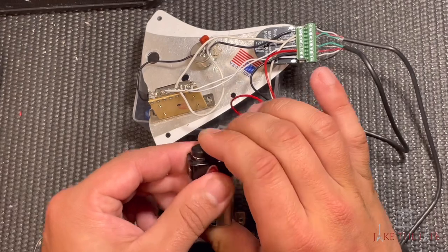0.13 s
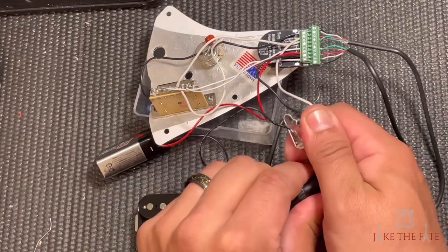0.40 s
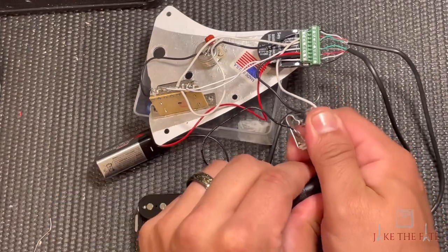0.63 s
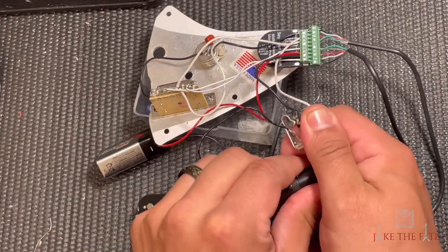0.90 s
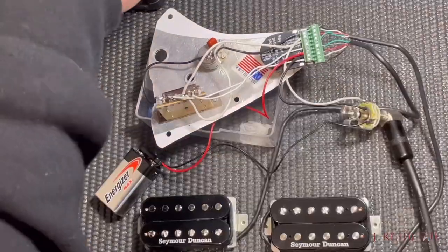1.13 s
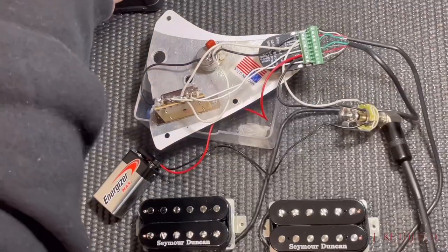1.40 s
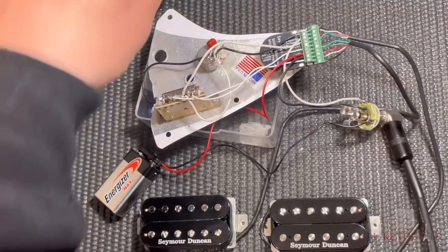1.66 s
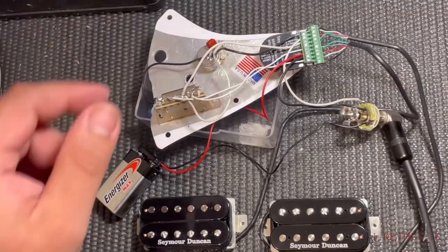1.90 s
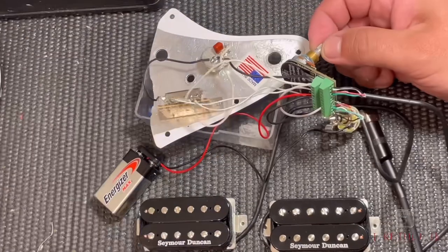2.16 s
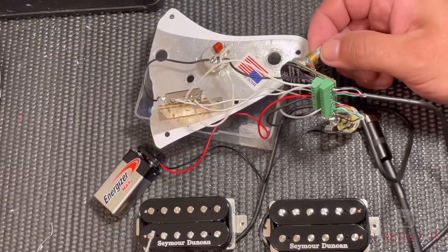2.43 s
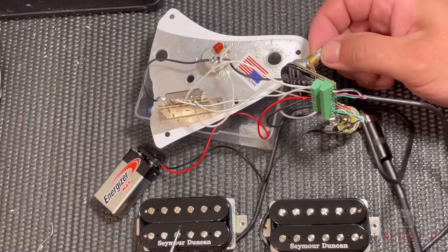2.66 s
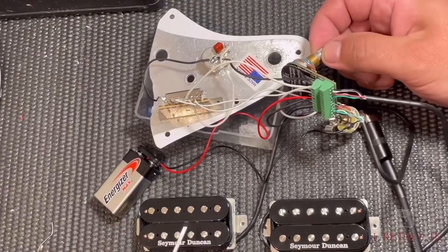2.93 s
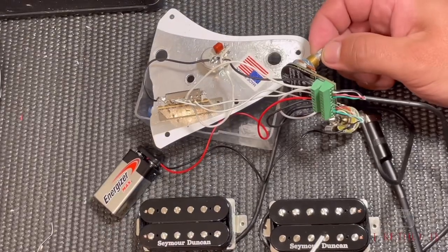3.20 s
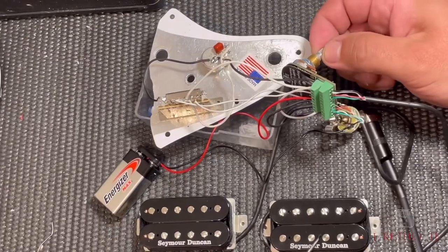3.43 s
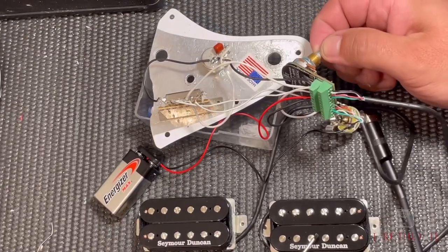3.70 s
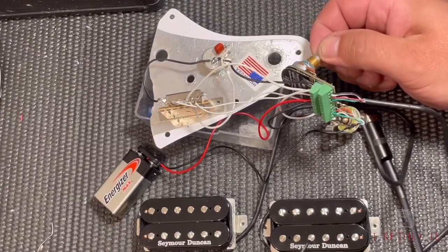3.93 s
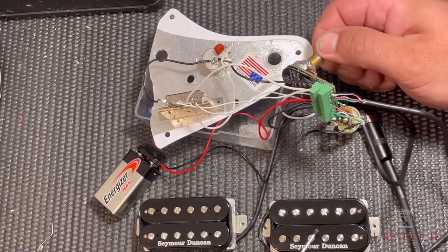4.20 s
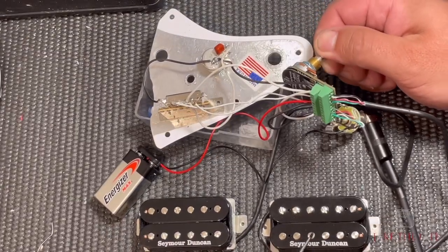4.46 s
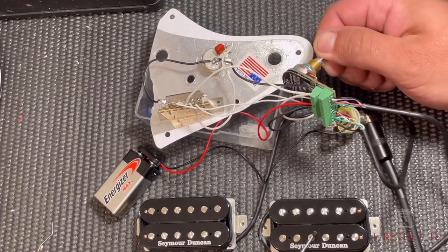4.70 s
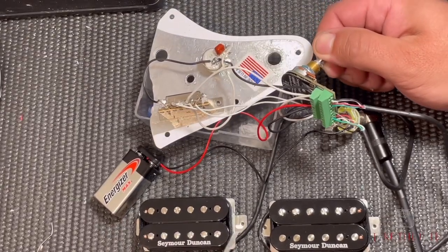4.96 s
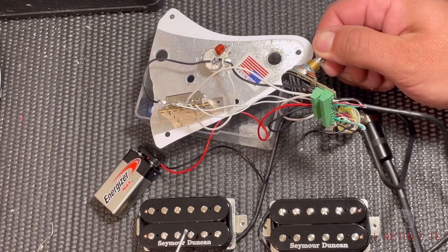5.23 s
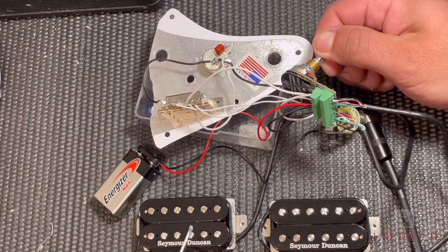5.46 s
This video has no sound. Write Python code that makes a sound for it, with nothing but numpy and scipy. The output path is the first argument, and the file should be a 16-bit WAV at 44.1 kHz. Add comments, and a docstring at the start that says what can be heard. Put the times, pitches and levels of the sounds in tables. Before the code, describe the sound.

Quiet handling bumps and one bright jack click, then irregular metallic screwdriver taps that turn into loud popping thumps through a loudspeaker.

```python
"""Screwdriver taps on pickup poles

A plug snaps into a jack on a padded workbench, small parts bump and scuff, then a screwdriver taps and slips.
Metal clicks are bursts of tiny touches that set resonances ringing; rubbing and rustling are coloured noise.
As the volume knob is turned up, loudspeaker thumps join the taps: short tones of sinking pitch, with echoes.
A small room reflects the blows, over rumble, mains hum and air; the left and right treble are out of step."""
import sys
import numpy as np
from scipy import signal
from scipy.fft import rfft, irfft
from scipy.io import wavfile

SR = 44100
rng = np.random.default_rng(int(sys.argv[2]) if len(sys.argv) > 2 else 0)


def to_wav(sig):
    """Store sig (one row per channel, or 1-D mono) as 16-bit WAV at the path in sys.argv[1].

    Samples outside -1..1 are clipped; the rate is SR.
    """
    pcm = np.clip(np.atleast_2d(sig), -1, 1) * 32767
    pcm = np.round(pcm).astype(np.int16)
    wavfile.write(sys.argv[1], SR, pcm.T)  # frames by channels


def invert_db(level):
    """Linear amplitude ratio for a level in decibels (20 dB per decade), elementwise."""
    return 10 ** (np.asarray(level, dtype=float) / 20)


N = 246938   # length of the sound [samples]

# Background levels, some of them stepping quickly: (time [s], rumble level [dB], swish level [dB])
BACKGROUND_LEVELS = [(0, -62.5, -95.5), (0.851, -57.5, -97), (1.08, -65.5, -98.5), (1.53, -58.5, -82),
                     (2.099, -63.5, -77.5), (2.4, -66.5, -92.5), (2.8, -56, -98), (3.5, -65, -95),
                     (3.981, -58, -78), (4.101, -74, -95), (5.0, -70, -86), (5.6, -56.5, -96.5)]


def rms_one(x):
    """Scale to unit rms, so that a later gain sets the level."""
    return x / np.sqrt(np.mean(x ** 2) + 1e-20)


def at_hz(points, hz, axis=1):
    """Read a column of a frequency table, with straight lines between points on a log frequency axis."""
    table = np.array(sorted(points))
    return np.interp(np.log(hz + 1), np.log(table[:, 0]), table[:, axis])


def ring(clicks, hz, t60):
    """Like a struck object, a unit click starts a decaying sine; t60 is its 60 dB decay time in seconds."""
    radius = invert_db(-60 / (t60 * SR))
    angle = 2 * np.pi * hz / SR
    feedback = [1, -2 * radius * np.cos(angle), radius * radius]
    return signal.lfilter([0, np.sin(angle)], feedback, clicks + 1e-18)


def cut(x, hz, kind):
    """Second-order Butterworth filter: keeps the low, high or band part of the sound."""
    return signal.sosfilt(signal.butter(2, hz, kind, fs=SR, output="sos"), x)


def diffuse_noise(size, width=1):
    """Spectrum of white stereo noise, its channels partly alike at each frequency, and the frequencies."""
    # Left-right likeness: (frequency [Hz], likeness [0 to 1])
    ear_likeness = [(30, .96), (60, .99), (130, .985), (300, .75), (600, .55), (1300, .75), (2200, .99),
                    (4000, .99), (5000, .85), (7000, .9), (9200, .999), (11000, .999), (12500, .88),
                    (15000, .97)]
    hz = np.arange(size // 2 + 1) * SR / size
    alike = np.clip(1 - width * (1 - at_hz(ear_likeness, hz)), 0, 1)
    mid, side = rfft(rng.standard_normal((2, size)))
    shared = np.sqrt(1 + alike) * mid
    opposed = np.sqrt(1 - alike) * side * [[1], [-1]]
    return (shared + opposed) / np.sqrt(2), hz


def hiss(colour, flicker_db, rate):
    """Coloured stereo noise of rms 1, its level drifting between random values drawn at rate per second."""
    white, hz = diffuse_noise(size=N)
    # there are 600 draws: at a high rate the last one holds to the end
    flicker = np.interp(np.arange(N) * rate / SR, np.arange(600), rng.standard_normal(600))
    noise = irfft(white * invert_db(at_hz(colour, hz)), N)
    return rms_one(noise * invert_db(flicker_db * flicker))


def swells(moves):
    """Each swell rises and falls in straight dB lines, 30 dB in its rise or fall time; one gain row each."""
    s, peak_db, rise, fall = np.transpose(moves)[:4, :, None]
    late = np.arange(N) / SR - s
    drop = np.maximum(late / np.maximum(fall, .01), -late / np.maximum(rise, .01))
    return invert_db(peak_db - 30 * drop)


def contacts(events, modes, ring_db, sliding=False):
    """Solids meet in a sharp touch and dying chatter, or slide in a swell of touches; their modes ring."""
    edge_hz = 4400   # the edge gain acts above this
    chatter_db = -10   # chatter energy against that of its pressure curve
    uneven_db = 1.5   # every blow rings each mode a little differently
    t_ms = np.arange(6000) * 1000 / SR
    body, middle, edge = np.zeros((3, N + len(t_ms)))
    struck = np.zeros((len(modes), N + len(t_ms)))
    for s, level_db, body_db, edge_db, chatter_ms in events:
        x = t_ms / max(chatter_ms, .1)
        pressure = x * np.exp(1 - x) if sliding else np.exp(-x)   # a slide swells before it fades
        touches = rng.laplace(size=len(t_ms)) * pressure
        touches *= np.sqrt(np.sum(pressure ** 2) / np.sum(touches ** 2)) * invert_db(chatter_db)
        touches[0] = 0 if sliding else 1   # the sharp first touch
        touches *= invert_db(level_db)
        here = slice(round(s * SR), round(s * SR) + len(t_ms))
        body[here] += touches * invert_db(body_db)
        middle[here] += touches
        edge[here] += touches * invert_db(edge_db)
        for row, (hz, mode_db, t60) in zip(struck, modes):
            gain_db = mode_db + ring_db + uneven_db * rng.standard_normal() + edge_db * (hz > edge_hz)
            row[here] += touches * invert_db(gain_db)
    direct = cut(middle, edge_hz, "low") + cut(edge, edge_hz, "high")
    ringing = sum(ring(row, hz, t60) for row, (hz, mode_db, t60) in zip(struck, modes))
    # small metal parts radiate little below 1900 Hz
    thin = cut(cut(direct + ringing, 1900, "high"), 1900, "high")
    return (cut(body, [500, 1700], "band") + thin)[:N]


def screwdriver():
    """The blade taps metal poles, which ring, and at times slips off; the bench reflects each tap once."""
    # Both: (time [s], level [dB], body gain [dB], edge gain [dB], chatter time [ms])
    pole_taps = [(2.5887, -22.5, -13, 9, 1), (2.6849, -29.5, -27, 5, 0.49), (2.7881, -26.5, -30, 11.5, 1.8),
                 (3.1405, -11.5, -29.5, 4.5, 0.39), (3.3689, -24.5, -34, 7.5, 1.1),
                 (3.4168, -35, -6, 3, 0.81), (3.7414, -21.5, -12, 4.5, 3), (3.8003, -32.5, 6, -16.5, 2.7),
                 (3.8484, -25, 3, 5, 2.7), (4.0078, -50, 18, -16, 1.3), (4.2131, -15, -21, -11.5, 1.6),
                 (4.3081, -15, 10, -6.5, 3.2), (4.6783, -16.5, 6, -5.5, 8.8), (4.755, -4, 4.5, -7, 0.64),
                 (4.8344, -31.5, 11, -13.5, 2.3), (4.8764, -41, -4, -42, 1.3), (5.0838, -15.5, 4, -1.5, 2),
                 (5.0865, -13, -12, -5, 1.2), (5.3345, -30, -2.5, -10, 2.8), (5.3445, -25, 10, -2.5, 3.1),
                 (5.3574, -24, -16, -1, 4.6)]
    blade_slips = [(3.2175, -44, -31, 6.5, 4.5), (3.2405, -37, -31, 11, 1.05), (3.917, -46.5, 4, 4, 5),
                   (3.9361, -30.5, -4, 0, 1), (3.9506, -56, 3, -13.5, 2.8), (4.0372, -42.5, 4, 0, 7.4),
                   (4.0596, -39, 2, 4.5, 2.6), (4.3909, -37, 9, -9, 5), (4.4843, -39, 7.5, -4.5, 7.1),
                   (4.5112, -32, 8.5, -12, 1.5), (5.404, -36, 9, -21, 2), (5.416, -34, 23.5, -8, 0.68)]
    # Ringing of the poles: (frequency [Hz], level [dB], 60 dB decay time [s])
    pole_modes = [(2606, -3, 0.01), (3018, 4, 0.0027), (5565, 0.5, 0.0034), (9050, 3.5, 0.0031),
                  (13100, -30.5, 0.0092)]
    bounce_ms, bounce_db = 7.2, -13   # delay and level of the bench reflection
    taps = contacts(pole_taps, pole_modes, ring_db=-17.5)
    bounce = np.pad(taps, (round(bounce_ms * SR / 1000), 0))[:N]
    slips = contacts(blade_slips, pole_modes, ring_db=-18.5, sliding=True)
    return taps + invert_db(bounce_db) * bounce + slips


def loudspeaker():
    """The cone swings a few times at a sinking pitch and stops; the jolt rings it; the amplifier echoes."""
    # Thumps: (time [s], level [dB], starting pitch [Hz], swell time scale [ms])
    thump_events = [(3.7468, -32, 240, 2.1), (3.852, -38, 269, 0.87), (3.944, -43, 260, 1.1),
                    (4.039, -55, 262, 22), (4.2105, -23, 241, 3.1), (4.314, -32.5, 268, 0.85),
                    (4.401, -48.5, 263, 4.5), (4.494, -54, 267, 6), (4.528, -50.5, 235, 4),
                    (4.682, -17.5, 249.5, 2.1), (4.755, -32.5, 263, 1.3), (5.0863, -10, 235.7, 2.9),
                    (5.3344, -16.5, 297.7, 1.9), (5.341, -11.5, 248.5, 4.4), (5.3613, -9, 338, 1.7)]
    # Breakup ringing of the cone: (frequency [Hz], level [dB], 60 dB decay time [s])
    cone_modes = [(385, -24, 0.02), (500, -27, 0.008), (1000, -30, .006), (1180, -25, 0.006),
                  (1900, -31, 0.004), (2400, -33, 0.002)]
    # Echoes: (delay [s], level [dB])
    echo_taps = [(0.035, -37), (0.063, -16), (0.12, -16.5), (0.182, -34), (.243, -36)]
    sag, stop_ms, crackle_ms = .24, 23, 5   # pitch fall as a fraction; times of swing stop and crackle decay
    lopsided_db = -1   # the cone swings out more easily than in
    t_ms = np.arange(2048) * 1000 / SR
    swing, jolt = np.zeros((2, N + len(t_ms)))
    for s, level_db, hz, swell_ms in thump_events:
        here = slice(round(s * SR), round(s * SR) + len(t_ms))
        x = t_ms / max(swell_ms, .5)
        shape = x * np.exp(1 - x ** 0.67) / (1 + (t_ms / stop_ms) ** 10)
        turns = np.cumsum(hz * (1 - sag * np.minimum(t_ms / stop_ms, 1))) / SR
        swing[here] += invert_db(level_db) * shape / shape.max() * np.sin(2 * np.pi * turns)
        jolt[here] += invert_db(level_db - 1.5) * rng.standard_normal(len(t_ms)) * np.exp(-t_ms / crackle_ms)
    # squaring the swing gives the low lump of air that loud thumps push
    lump = invert_db(lopsided_db) * cut(cut(swing ** 2, [75, 160], "band"), 75, "high")
    breakup = sum(invert_db(db) * ring(jolt, hz, t60) for hz, db, t60 in cone_modes)
    thumps = (cut(cut(swing, 130, "high"), 130, "high") + lump + breakup)[:N]
    echoes = sum(invert_db(db) * np.pad(thumps, (round(s * SR), 0))[:N] for s, db in echo_taps)
    return thumps + cut(cut(echoes, [210, 1800], "band"), 188, "high")


def plug_in_jack():
    """The plug catches, then seats; each snap rings the metal of the jack."""
    # Snaps: (time [s], level [dB], body gain [dB], edge gain [dB], chatter time [ms])
    plug_snaps = [(.6654, -25, -6, -31.5, 5.3), (.6708, -23, -2.5, -7, 0.86), (.6728, -3, -4.5, 9, 1.5)]
    # Ringing of the jack: (frequency [Hz], level [dB], 60 dB decay time [s])
    jack_modes = [(2100, -3, .003), (3200, -1.5, .0035), (5400, -5, .002), (6800, -4, .002),
                  (10800, -3, .0015), (13000, -9, .0015)]
    return contacts(plug_snaps, jack_modes, ring_db=-12.5)


def parts_on_mat():
    """Parts bump and land on the mat, and fingers drag on them; both ring the same short modes."""
    # Both: (time [s], level [dB], body gain [dB], edge gain [dB], chatter time [ms])
    landings = [(.1426, -37.5, -20, -4, 2.2), (.3965, -56, 19.5, -16, 2), (.8106, -33.5, 12, -29, 0.29),
                (.8224, -30.5, -27, -6, 2.3), (.8759, -67.5, 35, -19, 1.25), (1.3389, -34.5, -2, 7.5, 3.9),
                (1.3468, -25, 0.5, -23, 3.9), (1.4556, -31, 2.5, -16, 17.3), (1.6407, -62.5, 18.5, 0, 10)]
    finger_drags = [(.172, -55, 9, -38, 12.5), (.25, -60, 7, -46, 19), (.595, -65, 9, -25, 26),
                    (1.045, -61.5, 15.7, -12, 10), (1.29, -54.5, 6, -9.5, 26), (2.89, -52.5, 10, -25, 11.8)]
    # Ringing on the mat: (frequency [Hz], level [dB], 60 dB decay time [s])
    mat_modes = [(1850, 1, 0.00074), (3700, -11.5, 0.006), (5900, 0, 0.0059), (6965, 4, 0.0075),
                 (11400, -22.5, 0.00089)]
    landed = contacts(landings, mat_modes, ring_db=-21.5)
    return landed + contacts(finger_drags, mat_modes, ring_db=-12.5, sliding=True)


def wire_scratches():
    """A wire end scratches: weak touches set two close tones ringing."""
    # Scratches: (time [s], level [dB], body gain [dB], edge gain [dB], chatter time [ms])
    wire_twitches = [(.9405, -66.5, -30, -30, 3.6), (.963, -66, -30, -30, 3), (.986, -70, -30, -30, 1.6)]
    # Ringing of the wire: (frequency [Hz], level [dB], 60 dB decay time [s])
    wire_modes = [(2490, -4.5, 0.013), (2700, -5, 0.0097)]
    return contacts(wire_twitches, wire_modes, ring_db=-3.5)


def room(x):
    """Walls and nearby surfaces return sound as stereo noise that dies away band by band."""
    # Reflections: (frequency [Hz], level [dB], 60 dB decay time [s])
    wall_decay = [(190, -46.5, 0.4), (437, -38, 0.33), (1200, -33, 0.18), (3060, -36, 0.17),
                  (7000, -36, 0.21), (12087, -26.5, 0.18), (16000, -39.5, .1)]
    build_up_s = .004
    near_db, near_s = 5, .008   # nearby surfaces answer louder than the walls, and briefly
    size = 2 ** 14
    white, hz = diffuse_noise(size=size, width=0.4)   # all reflections are narrow, left and right much alike
    t = np.arange(size) / SR
    response = 0
    for centre in 100 * 2 ** np.arange(0, 7.5, .5):
        band = irfft(white * np.exp(-(np.log2((hz + 1) / centre) / .35) ** 2), size)
        decay_db = -60 * t / at_hz(wall_decay, centre, axis=2)
        response = response + band * invert_db(at_hz(wall_decay, centre) + decay_db)
    # the reflections hold nothing above about 15.5 kHz
    response = signal.sosfilt(signal.butter(8, 15500, fs=SR, output="sos"), response)
    response = response * np.minimum(t / build_up_s, 1) ** 2
    response = response * (1 + invert_db(near_db) * np.exp(-t / near_s))
    return signal.fftconvolve(x[None], response, axes=1)[:, :N]


def hands_on_bench():
    """Palms rub and bump the bench and its top hums along; the legs take a weight with low thuds."""
    # Movements: (time of peak [s], peak level [dB], 30 dB rise time [s], 30 dB fall time [s])
    palm_rubs = [(.18, -63, 0.024, 0.44), (.36, -57.5, 0.12, 0.18), (.49, -57, 0.017, 0.13),
                 (.85, -63.5, .04, 0.21), (.975, -67.5, 0.026, 0.26), (2.89, -61, 0.55, 0.37)]
    palm_bumps = [(.678, -52, 0.025, 0.11), (1.355, -57.5, 0.096, 0.17), (1.465, -44, 0.013, 0.074),
                  (1.67, -55.5, 0.034, 0.046), (3.15, -61.5, 0.049, 0.071)]
    leg_thuds = [(.8, -60.5, 0.087, 0.076), (1.37, -46, 0.12, 0.053), (1.5, -55, 0.18, 0.046)]
    # Colours: (frequency [Hz], level [dB])
    top_colour = [(200, -28.5), (250, -8.5), (285, 7.5), (325, -10.5), (375, -1.5), (430, -10.5),
                  (600, -26.5), (1200, -50)]
    rubbing_colour = [(120, -22.5), (200, 7), (290, 1), (380, -2.5), (520, -5), (900, -14.5), (1600, -48.5)]
    leg_colour = [(40, -19.5), (70, 5), (110, -4), (160, -37)]
    rest_db = -80.5   # hands never lie quite still
    humming_top = swells(palm_rubs).sum(axis=0) * hiss(top_colour, flicker_db=6.0, rate=45)
    rubbing = invert_db(rest_db) + swells(palm_bumps).sum(axis=0)
    thuds = swells(leg_thuds).sum(axis=0) * hiss(leg_colour, flicker_db=6.2, rate=31)
    return humming_top + rubbing * hiss(rubbing_colour, flicker_db=1.0, rate=59) + thuds


def rustle_and_swish():
    """Rustle swells: hands and sleeves at first, later mostly noisy tails after taps and thumps."""
    # Swells: (time of peak [s], peak level [dB], 30 dB rise time [s], 30 dB fall time [s],
    # bright swish against rustle [dB])
    rustle_swells = [(.24, -69, 0.17, 0.15, -15), (0.841, -74.5, .2, 0.18, -19.5),
                     (1.09, -72.5, 0.18, 0.23, 4), (1.4, -78.5, .25, 1, -5), (1.98, -72, 0.2, 0.21, -9),
                     (2.169, -71.5, .1, 0.16, 0), (2.3, -78, 0.21, .2, -3), (2.53, -77, 0.15, 0.12, -4),
                     (2.8, -69, 0.36, 0.34, -23), (2.93, -70.5, 0.17, .6, -4.5),
                     (3.24, -89.5, 0.19, 0.089, 13), (3.411, -82, 0.033, 0.05, 26.5),
                     (3.93, -64, 0.24, 0.29, -13), (4.381, -61, 0.22, 0.13, -23),
                     (4.52, -61.5, 0.094, 0.067, -6), (5.002, -70.5, 0.7, 0.5, -14),
                     (5.449, -63, 0.1, 0.47, -17)]
    # Colours: (frequency [Hz], level [dB])
    rustle_colour = [(500, -28), (1000, 0.5), (1400, 0.5), (2500, 4), (4000, -3.5), (6000, -8.5),
                     (9000, -27)]
    swish_colour = [(3000, -28.5), (5000, -9.5), (7000, -6.5), (10000, -0.5), (13000, -2), (15000, -14),
                    (16000, -31)]
    s, _, steady_db = np.transpose(BACKGROUND_LEVELS)
    gains = swells(rustle_swells)
    swish = invert_db(np.interp(np.arange(N) / SR, s, steady_db)) + invert_db(np.array(rustle_swells)[:, 4]) @ gains
    rustle = gains.sum(axis=0) * hiss(rustle_colour, flicker_db=3.5, rate=37)
    return rustle + swish * hiss(swish_colour, flicker_db=2.0, rate=180)


def building():
    """Low rumble noise and a sine of mains hum rise and fall together."""
    # Colour of the rumble: (frequency [Hz], level [dB])
    rumble_colour = [(20, -32.5), (35, -2), (52, -14), (60, 1), (68, -3), (100, -14), (121, -6),
                     (140, -24.5), (170, -22.5), (250, -66.5)]
    hum_hz, hum_db = 59.5, -0.5   # sine height against the rumble's rms
    t = np.arange(N) / SR
    s, rumble_db, _ = np.transpose(BACKGROUND_LEVELS)
    hum = invert_db(hum_db) * np.sin(2 * np.pi * hum_hz * t)
    return invert_db(np.interp(t, s, rumble_db)) * (hum + hiss(rumble_colour, flicker_db=1.5, rate=10.0))


def room_air():
    """Faint air noise runs throughout, its level flickering."""
    # Colour of the air: (frequency [Hz], level [dB])
    air_colour = [(150, 4), (300, -7), (550, -9.5), (680, -3.5), (740, 4), (810, -5.5), (1100, -12.5),
                  (2000, -20), (5000, -27.5), (10000, -28), (15000, -34), (16000, -58)]
    return invert_db(-72) * hiss(air_colour, flicker_db=3.9, rate=11)


def scene():
    """All blows and thumps excite the same room; small objects radiate no deep bass."""
    blows = screwdriver() + plug_in_jack() + parts_on_mat() + wire_scratches()
    blows = cut(cut(blows, 730, "high") + loudspeaker(), 81, "high")
    return blows + room(blows) + hands_on_bench() + rustle_and_swish() + building() + room_air()


def band_limit(x):
    """A steep low-pass at the top of the band."""
    return signal.sosfilt(signal.butter(12, 16970, fs=SR, output="sos"), x)


def record(dry):
    """Two microphone ports hear the treble out of step in phase; a steep filter cuts the very top."""
    # Phase between the ports: (frequency [Hz], lead of the left [radians])
    left_lead = [(0, 0), (2400, .25), (4200, .4), (4850, 1.6), (5400, 0), (6100, .3), (6700, 1.1),
                 (8000, 2.0), (8900, 2.6), (9400, 2.95), (10900, 3.35), (11500, 3.9), (13400, 5.2),
                 (14300, 6), (15000, 6.28)]
    lead = np.interp(np.arange(N // 2 + 1) * SR / N, *np.transpose(left_lead))
    ports = irfft(rfft(dry) * np.exp(.5j * lead * [[1], [-1]]), N)   # half the lead each way
    mix = signal.sosfilt(signal.cheby2(10, 50, 16900, fs=SR, output="sos"), ports)
    return band_limit(mix)


dry = scene()
out = record(dry)
to_wav(out)
```